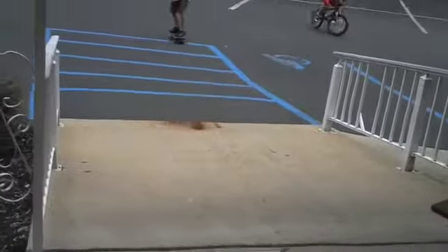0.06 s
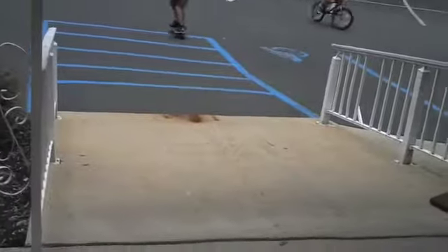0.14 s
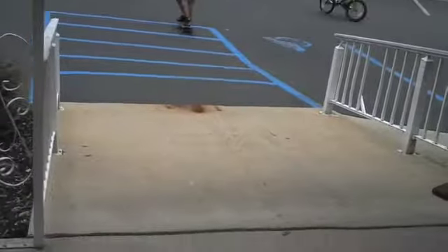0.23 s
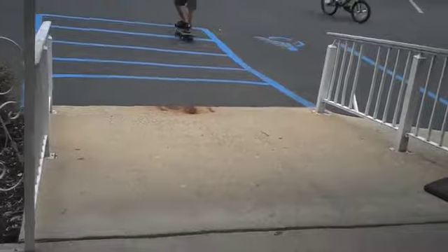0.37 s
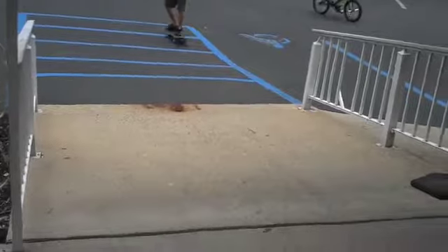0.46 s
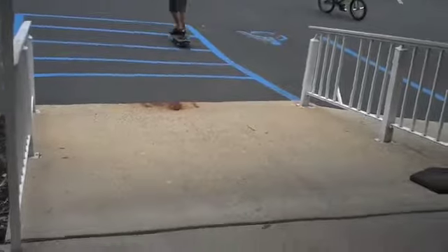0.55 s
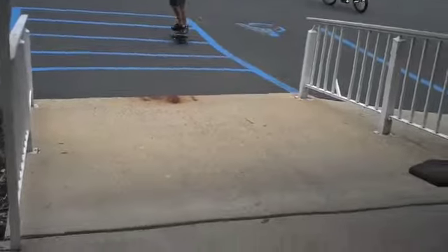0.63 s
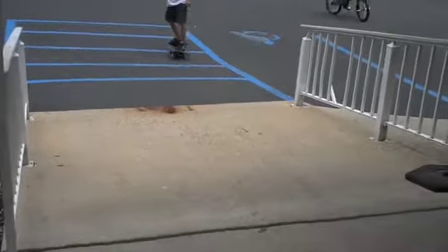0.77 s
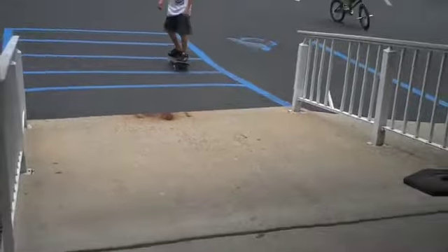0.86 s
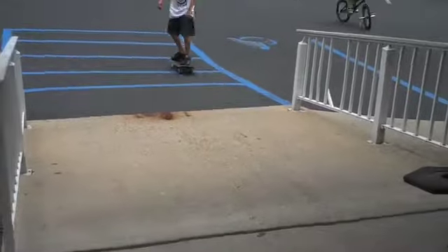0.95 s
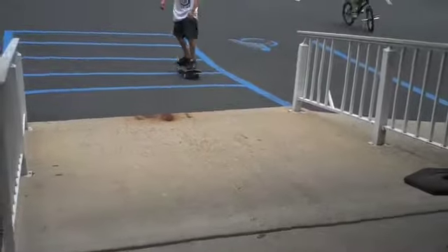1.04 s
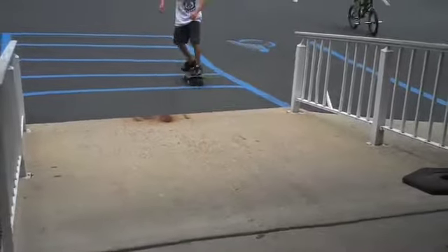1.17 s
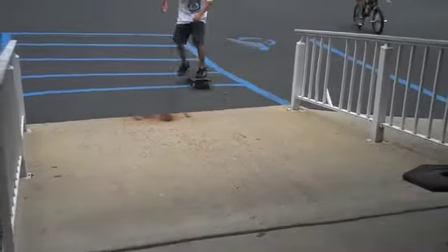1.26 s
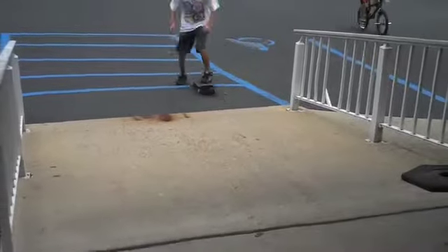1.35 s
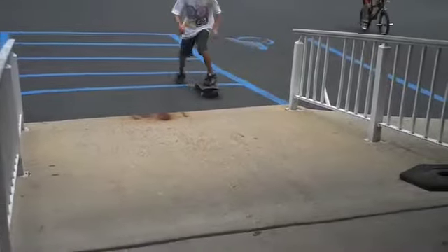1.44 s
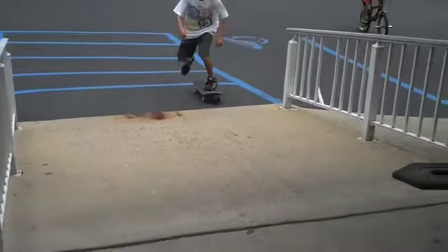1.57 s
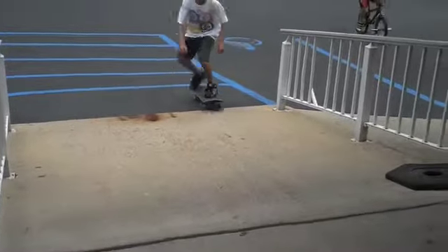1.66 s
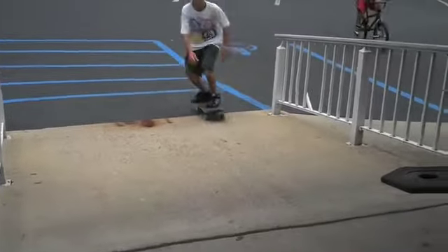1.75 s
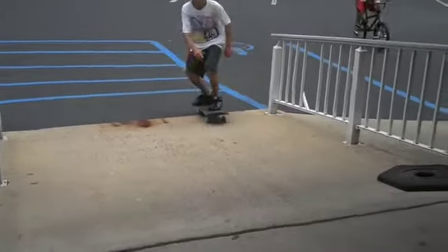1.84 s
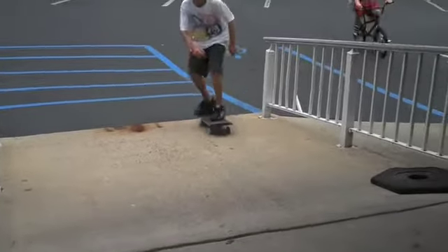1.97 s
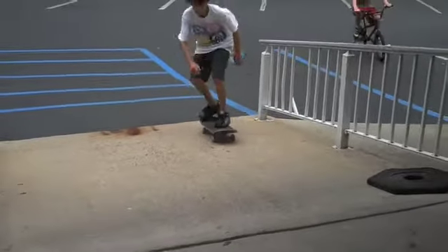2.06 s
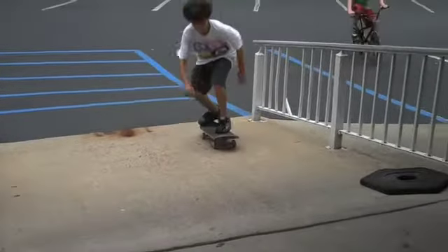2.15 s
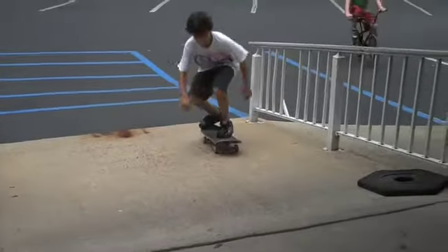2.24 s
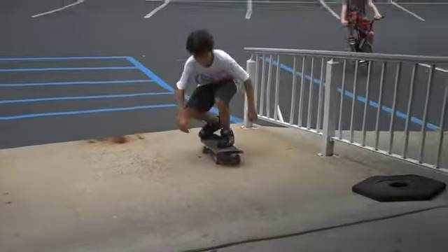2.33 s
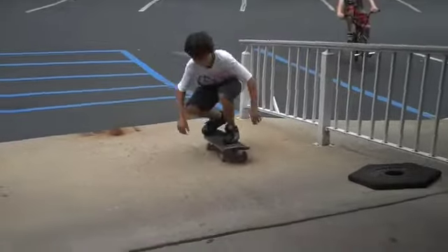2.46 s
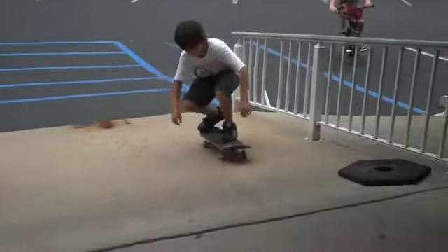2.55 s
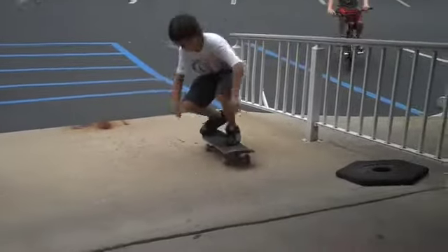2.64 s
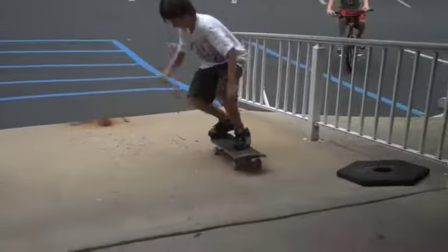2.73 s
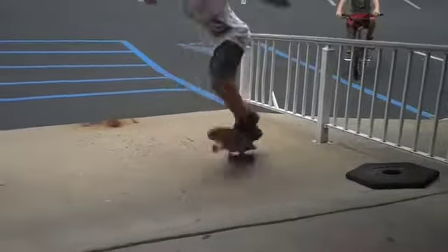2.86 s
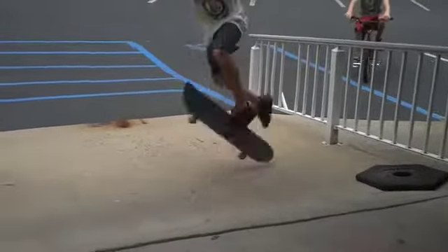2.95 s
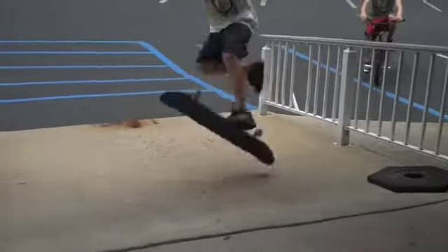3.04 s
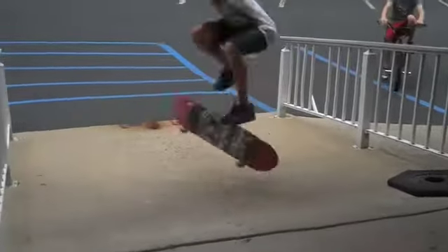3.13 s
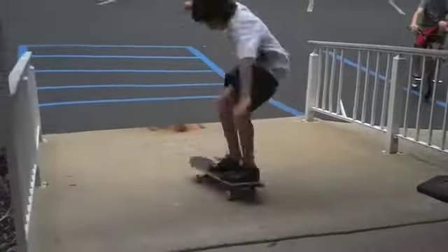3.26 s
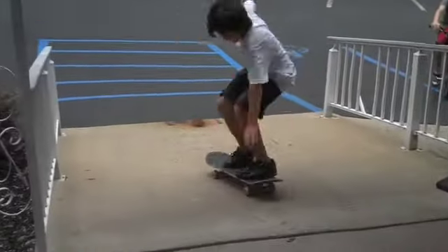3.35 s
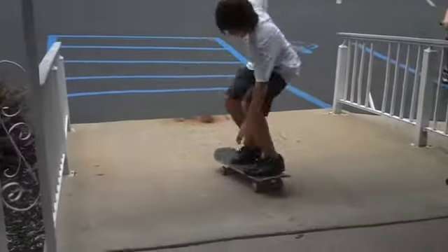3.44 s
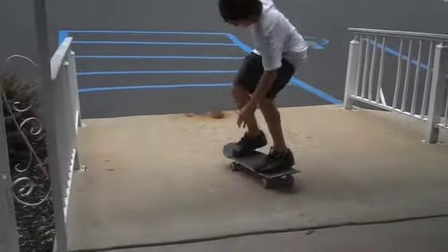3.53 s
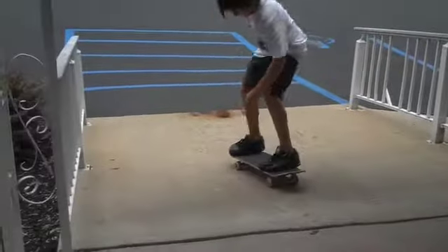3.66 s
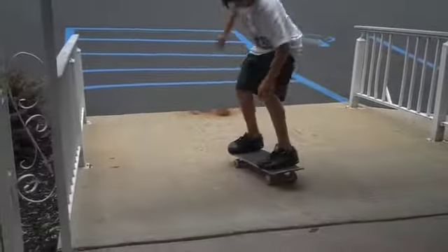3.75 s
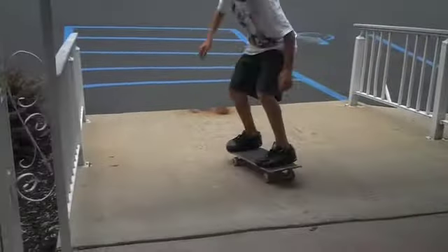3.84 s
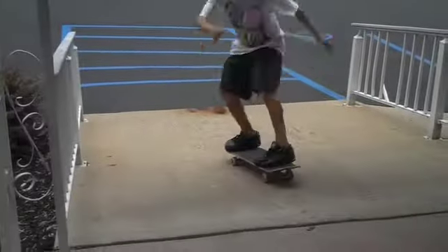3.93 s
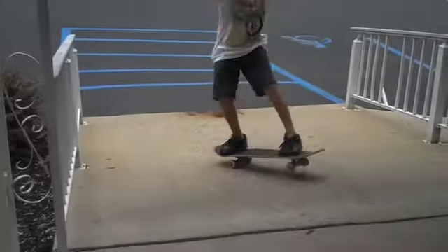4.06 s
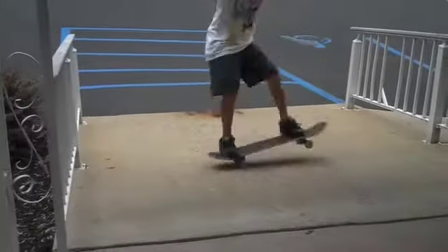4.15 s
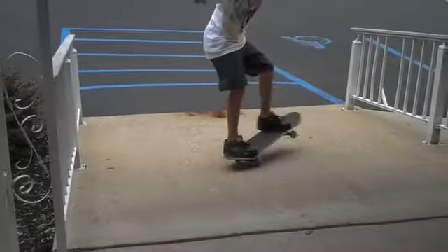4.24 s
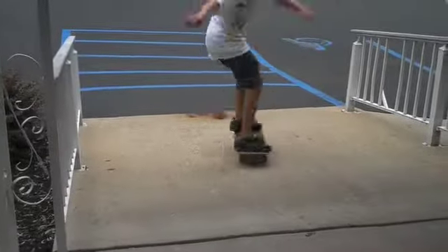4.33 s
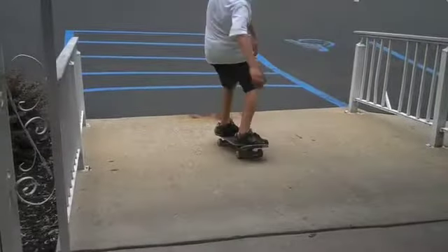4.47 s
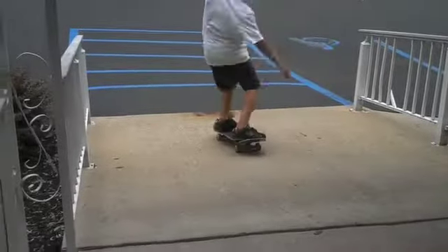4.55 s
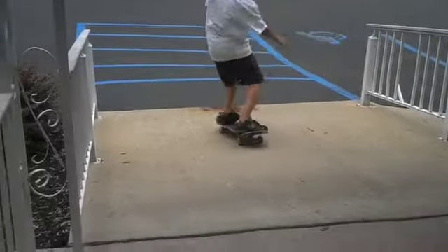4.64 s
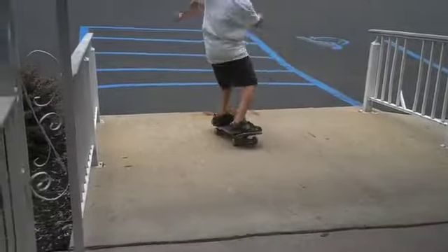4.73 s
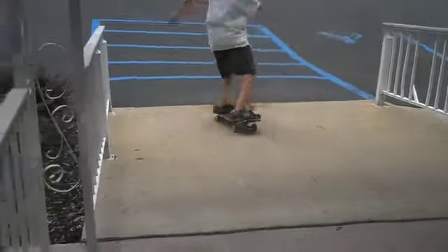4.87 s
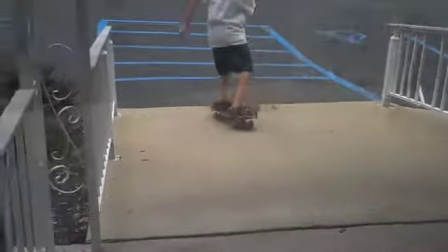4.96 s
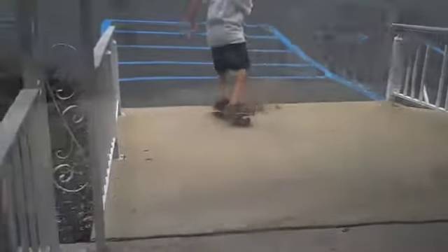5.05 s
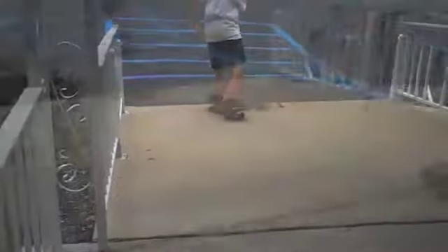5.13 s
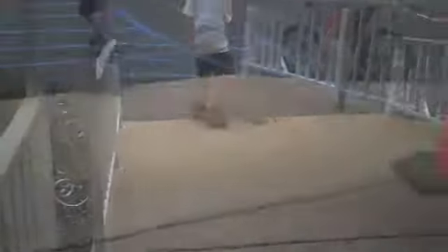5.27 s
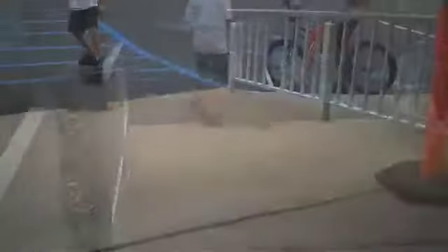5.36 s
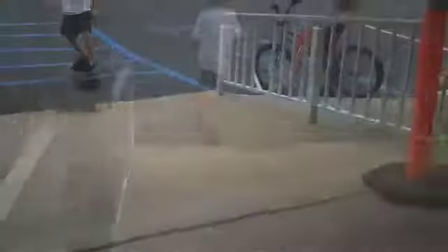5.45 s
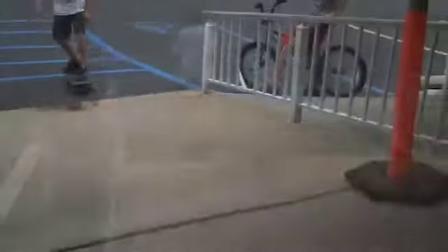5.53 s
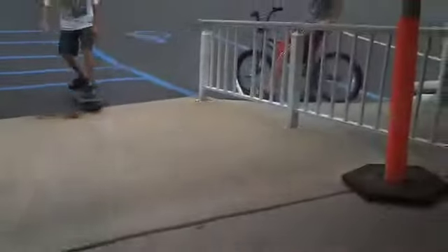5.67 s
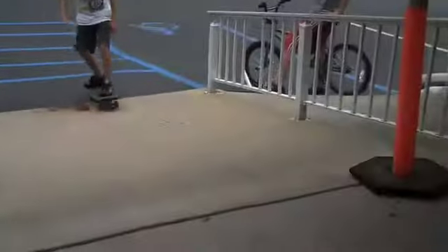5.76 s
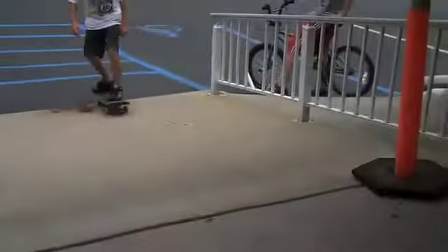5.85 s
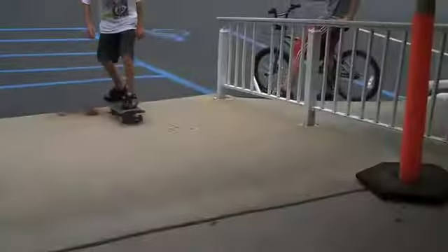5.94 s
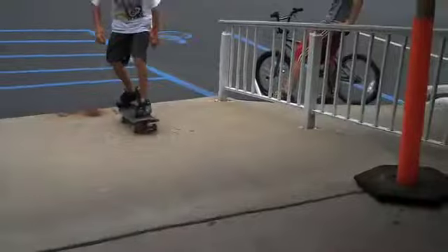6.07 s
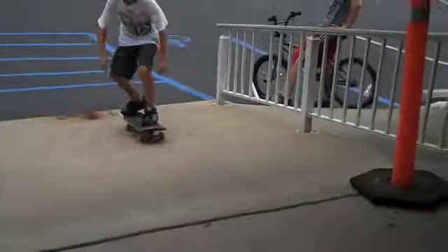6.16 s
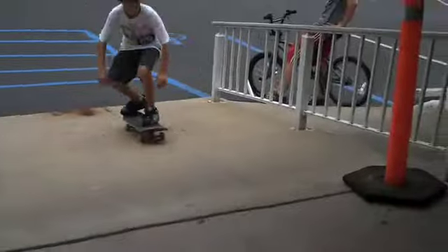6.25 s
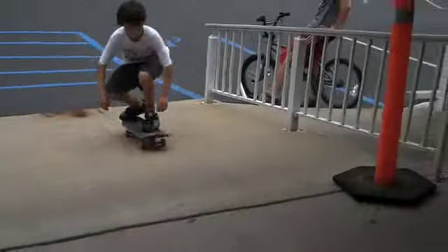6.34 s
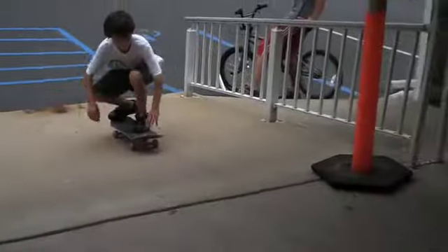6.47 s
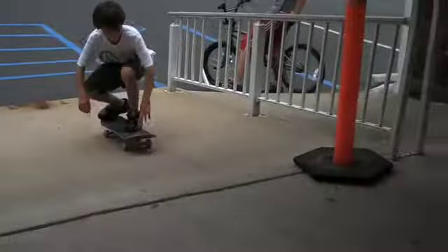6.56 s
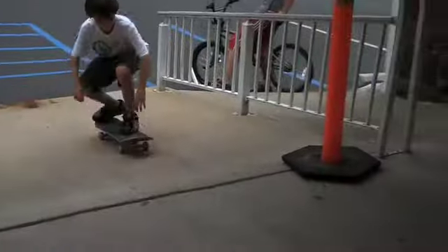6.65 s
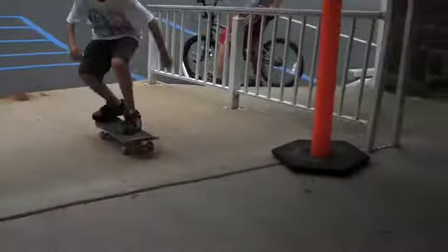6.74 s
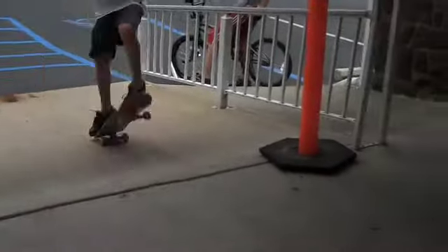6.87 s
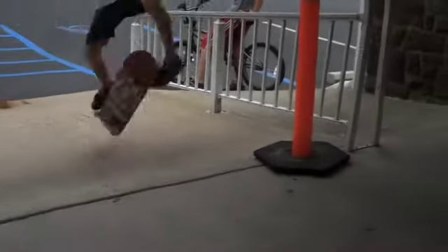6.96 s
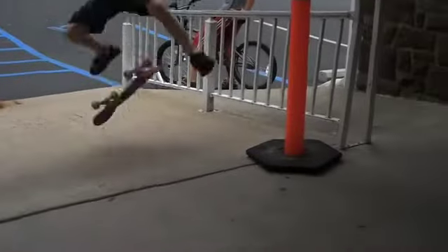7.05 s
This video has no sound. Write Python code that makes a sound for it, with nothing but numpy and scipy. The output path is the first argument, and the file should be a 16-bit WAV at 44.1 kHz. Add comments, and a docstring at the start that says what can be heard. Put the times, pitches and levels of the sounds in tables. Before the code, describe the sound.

Hard-edged grainy rolling swells toward the microphone, with a ringing wheel whine and double knock at the ramp edge. A dry crack of the deck, a brief lighter gap, then a heavy lower slap with truck rattle. Near-quiet creeping wheels, a small scrape-like knock, louder rolling again and a final pop, with short porch reflections and faint distant traffic air.

```python
"""Car park with a concrete ramp: a skateboard rolls in over asphalt, climbs, pops a trick, lands, turns away;
it comes up the ramp once more and pops again. Rolling is random grit through ground filters and wheel and deck
resonances; slaps, knocks and thuds are decaying bursts, damped sines and pulses at set times. A wall, a porch
and the yard answer over filtered-noise air; a small camera rounds off the loudest peaks and cuts the top."""
import sys
import numpy as np
from scipy import signal
from scipy.fft import rfft, irfft
from scipy.io import wavfile
from scipy.ndimage import uniform_filter1d

SR = 44100
rng = np.random.default_rng(int(sys.argv[2]) if len(sys.argv) > 2 else 0)


def to_wav(s):
    """Save 16-bit WAV."""
    ch = np.atleast_2d(s).T  # columns
    pcm = np.round(np.clip(ch, -1, 1) * 32767)  # PCM
    wavfile.write(sys.argv[1], SR, pcm.astype(np.int16))


N = 313110
T = np.arange(N) / SR  # s


def undb(db):
    """Decibels to amplitude gain."""
    return 10 ** (np.asarray(db) / 20)


def unit(x):
    """Scale to rms 1."""
    return x / np.sqrt(np.mean(x ** 2))


def curve(rows, axis=1):
    """One table column, linearly interpolated in time."""
    rows = np.asarray(rows)
    return np.interp(T, rows[:, 0], rows[:, axis])


def colour(x, points, lean=lambda hz: 0, size=2048):
    """Minimum-phase filter through (frequency [Hz], gain [dB]) points, plus an optional dB slope."""
    hz = np.maximum(np.arange(size // 2 + 1) * SR / size, 1)
    point_hz, point_db = np.transpose(points)
    gain_db = np.interp(np.log(hz), np.log(point_hz), point_db) + lean(hz)
    cepstrum = irfft(np.log(undb(gain_db)))
    # fold the cepstrum: causal response
    cepstrum[1:size // 2] *= 2
    cepstrum[size // 2 + 1:] = 0
    response = irfft(np.exp(rfft(cepstrum)))
    return signal.oaconvolve(x, response)[:len(x)]


def resonate(x, hz, width_hz):
    """Two-pole resonance."""
    b, a = signal.iirpeak(hz, hz / width_hz, fs=SR)
    return signal.lfilter(b, a, x)


def fade(t, t60_s):
    """Exponential decay, 60 dB in t60_s."""
    return np.exp(-np.log(1000) * t / t60_s)


def swell(s, width_s):
    """Gaussian rise and fall around time s, peak 1."""
    return np.exp(-((T - s) / width_s) ** 2)


def walk(rate_hz):
    """Random wander through straight-line knots, rms 1."""
    knots = rng.standard_normal(4096)
    return unit(np.interp(T * rate_hz, np.arange(len(knots)), knots))


def add(out, s, x):
    """Mix x in at time s."""
    i = int(s * SR)
    out[i:i + len(x)] += x[:len(out) - i]


# ground colour, asphalt and concrete: (frequency [Hz], gain [dB])
ASPHALT_COLOUR = [(180, -30.5), (300, -19.5), (483, -7.5), (523, -5), (606, -1), (656, -6.5), (1120, 0),
                  (1340, -4), (1640, -9.5), (1820, -5), (2010, -1), (2990, -15.5), (4500, -27),
                  (5850, -51.5), (9900, -120)]
CONCRETE_COLOUR = [(180, -48.5), (300, -9.5), (385, -21.5), (500, -4.5), (777, 1.5), (1180, 2.5),
                   (1400, 5.5), (1620, -0.5), (1820, -1), (2440, -6), (2700, -6), (3840, -9.5),
                   (4500, -18.5), (5850, -52), (9900, -120)]
# colour of deck rumble and urethane hiss: (frequency [Hz], gain [dB])
RUMBLE_COLOUR = [(40, -41.5), (80, -33.5), (130, -27.5), (200, -12.5), (270, -7), (360, 5), (470, 2),
                 (700, -25)]
HISS_COLOUR = [(2000, -33.5), (3300, 0), (4600, -2.5), (6200, 0.5), (7200, -3), (8000, -12), (9000, -20.5)]
# wheel and truck resonances: (centre [Hz], width [Hz], asphalt level [dB], concrete level [dB])
WHEEL_MODES = [(696, 86, -24, -16.5), (794, 173, -7.5, -10), (1013, 46, -16, -14), (1244, 63, -19, -37.5),
               (1619, 195, -8.5, -9.5), (2025, 110, -17.5, -15.5), (2369, 170, -20, -15)]
# resonances of the loaded deck: (centre [Hz], width [Hz], level [dB])
LOADED_DECK_MODES = [(114, 24, -21), (205, 39, -17.5), (550, 90, -6.5), (3875, 99, -14.5)]
# relative rolling level; ride in, slow turn after landing, second ride in: (time [s], level [dB])
FIRST_RUN_LEVEL = [(0, -34.5), (.62, -32.5), (.85, -27.5), (1.05, -30), (1.25, -32.5), (1.43, -29.5),
                   (1.51, -37), (1.68, -29.5), (1.86, -34), (1.98, -29.5), (2.22, -34.5), (2.45, -31.5),
                   (3.2, -40.5)]
TURN_LEVEL = [(3.42, -56), (4.0, -51.5), (4.3, -43.5), (4.65, -43), (4.83, -35.5), (5.0, -39.5)]
SECOND_RUN_LEVEL = [(5.28, -32), (5.55, -34.5), (5.76, -28.5), (5.86, -35), (5.98, -29.5), (6.22, -30.5),
                    (6.56, -38), (6.72, -28), (7.1, -41.5)]
# board's path: (time [s], distance from the camera [m])
BOARD_PATH = [(0, 12.2), (1.75, 5.56), (2.5, 3.96), (3.5, 3.35), (4.3, 4.04), (5.05, 6.24), (5.3, 7),
              (5.72, 5.7), (6.4, 4.42), (7.1, 3.38)]
RAMP_EDGE_M, EDGE_BLEND_M = 5.97, 0.12  # asphalt beyond the edge, concrete before it
NEAR_RUMBLE_DB = 5  # per halving of distance
WEIGHT_RUMBLE_DB_PER_DB = .45  # extra rumble per dB of weight_db
HISS_DB, CROUCH_HISS_DB = -13, 1.5  # re rolling level; gain per unit crouch
CREEP_DB, CREEP_DULLING_DB_PER_DB = -39.5, 0.46  # below CREEP_DB, hiss and high rings drop further
# coarse asphalt patch makes the high wheel resonances sing
PATCH_S, PATCH_WIDTH_S, PATCH_RING_DB = 0.84, 0.22, 6.5
SING_START_DB, SING_RISE_S = -4.5, 0.72  # high ring builds up as the board gathers speed


def rolling(uneven_db=1.33, slab_m=.9):
    """Grit shakes wheels and trucks; the loaded deck rumbles and the urethane hisses on the ground."""
    distance_m = curve(BOARD_PATH)
    up_ramp_m = RAMP_EDGE_M - distance_m
    concrete_share = np.clip(.5 + up_ramp_m / EDGE_BLEND_M, 0, 1)
    on_asphalt, on_concrete = np.sqrt(1 - concrete_share), np.sqrt(concrete_share)
    roll_db = curve([*FIRST_RUN_LEVEL, *TURN_LEVEL, *SECOND_RUN_LEVEL])
    crouch, weight_db = jumping()
    rumble_db, low_db, high_db, boom = run_tone()

    # slow wheels lose treble
    dull_db = CREEP_DULLING_DB_PER_DB * np.minimum(roll_db - CREEP_DB, 0)
    start_db = SING_START_DB * swell(0, SING_RISE_S)
    patch_db = PATCH_RING_DB * swell(PATCH_S, PATCH_WIDTH_S)
    high_db = high_db + dull_db + start_db + patch_db

    shake = shaking(concrete_share)
    asphalt = on_asphalt * unit(colour(shake, ASPHALT_COLOUR))
    concrete = on_concrete * unit(colour(shake, CONCRETE_COLOUR))
    body = undb(-3) * (asphalt + concrete)
    for hz, width_hz, asphalt_db, concrete_db in WHEEL_MODES:
        # each resonance wanders in level by itself
        ring_db = (low_db if hz < 1400 else high_db) + 2.34 * walk(9)
        ground_gain = on_asphalt * undb(asphalt_db) + on_concrete * undb(concrete_db)
        body += singing(hz, width_hz) * undb(ring_db) * ground_gain

    load = boom * np.clip(up_ramp_m / slab_m, 0, 1) ** 2 + crouch
    for hz, width_hz, db in LOADED_DECK_MODES:
        body += load * undb(db + 1.8 * walk(3.47)) * singing(hz, width_hz)

    near_db = NEAR_RUMBLE_DB * np.log2(RAMP_EDGE_M / distance_m)
    rumble_db = rumble_db + near_db + WEIGHT_RUMBLE_DB_PER_DB * weight_db
    rumble = unit(colour(grit(rate_hz=2000, spread_db=4.0), RUMBLE_COLOUR)) * undb(rumble_db)
    hiss_db = HISS_DB + CROUCH_HISS_DB * crouch + dull_db
    hiss = unit(colour(grit(rate_hz=14000, spread_db=4.5), HISS_COLOUR)) * undb(hiss_db)
    hiss *= undb(walk(27))

    # rough patches and uneven wheels flutter the whole sound
    flutter = undb(1.1 * walk(95) + uneven_db * walk(36))
    return undb(roll_db + weight_db - 2.5) * flutter * (body + rumble + hiss)


def grit(rate_hz, spread_db):
    """Random-sign impacts of stone grains under the wheels, a few much larger than the rest."""
    hit = rng.random(N) < rate_hz / SR
    size = undb(spread_db * np.minimum(rng.exponential(size=N), 4))
    return unit(hit * size * rng.choice([-1, 1], N))


def shaking(concrete_share):
    """Fine grit everywhere, coarser stones twice as strong on the asphalt."""
    stones = undb(-8) * grit(rate_hz=450, spread_db=2)
    return grit(rate_hz=7000, spread_db=1.5) + (1 - concrete_share / 2) * stones


def singing(hz, width_hz):
    """One resonance kept ringing by grit, rms 1."""
    narrow = resonate(grit(rate_hz=3000, spread_db=2.0), hz, width_hz)
    return unit(resonate(narrow, hz, 4 * width_hz))


# rider crouches, pushes off, unweights: (wheels go light [s], crouch depth [0-1], push level [dB])
JUMP_TIMES = [(2.782, 0.44, 4), (6.785, 1, -1)]
CROUCH_LEAD_S, CROUCH_WIDTH_S = .29, .22
PUSH_LEAD_S, PUSH_WIDTH_S = .07, .09
LIFT_S, FLIGHT_S, FREE_WHEEL_DB = .02, 0.427, -8  # unloaded wheels only whirr


def jumping():
    """Crouch depth, and the dB by which the push and the leap change the rolling."""
    crouch, weight_db = np.zeros(N), np.zeros(N)
    for s, depth, push_db in JUMP_TIMES:
        lifting = np.clip((T - s) / LIFT_S, 0, 1)
        airborne = lifting * np.clip((s + FLIGHT_S - T) / LIFT_S, 0, 1)
        crouch += depth * swell(s - CROUCH_LEAD_S, CROUCH_WIDTH_S)
        weight_db += push_db * swell(s - PUSH_LEAD_S, PUSH_WIDTH_S) + FREE_WHEEL_DB * airborne
    return crouch, weight_db


# tone of each stretch: (start [s], rumble at the ramp's edge [dB], low wheel ring [dB],
# high wheel ring [dB], boom of the deck on the slab [0-1])
RUN_TONES = [(0, -17, -1.5, 2.5, 0.02), (3.3, -19.5, 2.5, 5, 0.44), (5.1, -12, 1.5, 3, 0.06)]


def run_tone():
    """Rumble, low ring, high ring [dB] and deck boom, held per stretch with 0.1 s smoothing."""
    rows = np.array(RUN_TONES)
    current = np.searchsorted(rows[1:, 0], T)
    return uniform_filter1d(rows[current, 1:], size=SR // 10, axis=0).T


# modes of the maple deck: (frequency [Hz], level [dB], t60 [s])
DECK_MODES = [(235.5, -10, 0.2), (324, -7, 0.2), (440, -12, 0.25), (533, -21, 0.42), (606, -13, 0.092),
              (659.6, 1.5, .14), (711, 1, 0.083), (870, 2.5, 0.17), (1062, -4, 0.14), (1385, -10, .13),
              (1580, 4, 0.069), (1620, 9, 0.063), (1702, 2, 0.14), (1920, -25, .12), (2090, -13, 0.043),
              (2150, -19, .13), (2465, 8, 0.085), (2380, -23, 0.11), (2700, -9.5, 0.11), (3125, 3, .13),
              (3570, -12.5, .11), (4046, -3, 0.13), (4230, -4, 0.092)]
# deck struck by slab or shoes: (time [s], level [dB], blow centre [Hz], clatter t60 [s], ring level [dB])
DECK_SLAPS = [(2.8986, -7.5, 1950, 0.046, -6.5), (2.903, -12, 2000, 0.061, -4.5),
              (3.2087, -26, 1520, 0.25, -11), (3.2416, -5.5, 1330, 0.063, -14),
              (3.2695, -9, 790, 0.056, -9), (3.278, -8, 560, 0.062, -3.5), (3.3170, -27.5, 600, 0.06, 10.5),
              (6.8912, -9, 2080, 0.087, -2.5), (6.9010, -26, 1800, 0.091, 4)]
# colour of the crack: (frequency [Hz], gain [dB])
CRACK_COLOUR = [(30, -33), (120, -30.5), (220, -13), (350, -6.5), (700, -4), (1000, 0), (1300, -1.5),
                (1700, 3), (2400, 1.5), (3200, -5), (4500, -7.5), (7000, -9.5), (8500, -24)]


def slaps(focus_db=4.0):
    """The hard tail wakes the deck's high modes, the soft weight of the shoes its low ones."""
    out, t = np.zeros(N), T[:SR // 2]
    mode_hz, mode_db, mode_t60_s = np.transpose(DECK_MODES)
    modes = np.sin(2 * np.pi * mode_hz[:, None] * t) * fade(t, mode_t60_s[:, None])
    # neighbouring modes swing in opposite directions at the deck's end
    signs = (-1) ** np.arange(len(DECK_MODES))
    for s, db, centre_hz, t60_s, ring_db in DECK_SLAPS:
        def focus(hz):
            """Gain falls with squared octaves from the blow's centre."""
            return -focus_db * np.maximum(np.log2(hz / centre_hz), -1) ** 2

        crack = clatter(t, t60_s, CRACK_COLOUR, focus)
        mode_octaves = np.maximum(np.log2(mode_hz / centre_hz), -1.3)
        gains = undb(mode_db - 8 * mode_octaves ** 2)
        ring = (gains * signs) @ modes / np.linalg.norm(gains)
        add(out, s, undb(db) * (crack + undb(ring_db) * ring))
    return out


def clatter(t, t60_s, points, lean):
    """A blow's dense, decaying random rattle, starting near rms 1."""
    envelope = fade(t, t60_s)
    burst = colour(rng.choice([-1, 1], len(t)) * envelope, points, lean)
    return unit(burst) * np.sqrt(np.mean(envelope ** 2))


# wheels hit joints, stones or slab: (time [s], level [dB], rattle t60 [s], treble tilt [dB/octave],
# truck ring [Hz], ring level [dB])
WHEEL_KNOCKS = [ (.6660, -19, .045, -0.5, 713, -1.5), (.0800, -31.5, .07, -4, 726, 6.5),
                (0.855, -24, 0.02, 13, 1615, 9.5), (0.928, -27, 0.019, 1, 1630, 9),
                (1.1421, -26, 0.068, -1, 1540, 9), (1.4340, -26, 0.049, 0.5, 1266, -2),
                (1.6717, -13, 0.096, -4, 758, -1.5), (1.6927, -19.5, 0.021, 2, 927, 7),
                (1.82, -13.5, .04, -7.5, 795, 4.5), (1.8241, -18, 0.02, 1, 1910, 5),
                (1.945, -24.5, 0.054, -2.5, 1146, 1), (3.2397, -21, 0.054, -2, 1810, -6),
                (3.2490, -9, 0.02, -3, 703, 2.5), (3.2565, -12.5, 0.059, -2, 654, 12),
                (3.2738, -16, 0.043, 1, 893, 4), (3.6288, -35, 0.074, -4.5, 1650, -8),
                (4.4022, -20, 0.034, 0.5, 1600, 1), (4.4065, -16.5, 0.082, -4, 1350, -17),
                (4.4181, -19.5, 0.044, -3, 694, -2.5), (4.566, -31, 0.088, -2, 1520, 3.5),
                (5.2500, -29.5, 0.14, -0.5, 1520, -4), (5.3900, -31.5, 0.29, 0, 835, 4.5),
                (5.48, -33.5, 0.077, 1.5, 1590, 10), (5.6500, -19.5, 0.055, -2.5, 763, -3),
                (5.7882, -13.5, .055, -2.5, 1074, 3), (5.9779, -34.5, .049, 7, 735, 12.5),
                (6.2468, -25, .041, -2, 874, -0.5), (6.6960, -24, 0.044, -9.5, 794, 1.5)]
# colour of the knock: (frequency [Hz], gain [dB])
KNOCK_COLOUR = [(30, -21), (130, -41), (250, -24.5), (450, -15), (750, -1.5), (1100, 0), (1600, 0.5),
                (2100, 1), (2900, -9), (4500, -13.5), (6500, -13), (8500, -28)]


def knocks(ring_t60_s=0.051, contact_s=0.0012):
    """Wheels drop over an edge and jolt the trucks; the soft urethane rounds the attack."""
    out, t = np.zeros(N), T[:SR // 4]
    attack = np.minimum(t / contact_s, 1)
    for s, db, t60_s, tilt_db, ring_hz, ring_db in WHEEL_KNOCKS:
        rattle = clatter(t, t60_s, KNOCK_COLOUR, lambda hz: tilt_db * np.log2(np.maximum(hz / 1200, .5)))
        ring = undb(ring_db) * np.sin(2 * np.pi * ring_hz * t) * fade(t, ring_t60_s)
        add(out, s, undb(db) * (rattle + ring) * attack)
    return out


# short deep thuds: (time [s], pulse peak before the high-pass [dB])
DEEP_THUDS = [(0.819, -33), (1.672, -30), (1.822, -37), (2.901, -20), (3.243, -16), (3.283, -18),
              (6.894, -25)]


def thuds(push_s=0.00048):
    """One short push of air each, high-passed at 25 Hz."""
    out, x = np.zeros(N), T[:SR // 20] / push_s
    pulse = x * np.exp(1 - x)
    for s, db in DEEP_THUDS:
        add(out, s, undb(db) * pulse)
    return signal.sosfilt(signal.butter(2, 25, "high", fs=SR, output="sos"), out)


WALL_M = 3.4  # from the path to the wall beside the ramp


def side_wall(x, wall_db=-9):
    """The wall's echo lags more as the board draws near, so its comb of peaks slides."""
    distance_m = curve(BOARD_PATH)
    detour_m = np.hypot(distance_m, 2 * WALL_M) - distance_m
    lag_s = detour_m / 343  # speed of sound, m/s
    return x + undb(wall_db) * np.interp(T - lag_s, T, x, left=0)


# echoes from the building: (delay [s], level [dB])
BUILDING_ECHOES = [(.034, -21.5), (.045, -31)]
# colour of the reverberant tails: (frequency [Hz], gain [dB])
PORCH_COLOUR = [(60, -21.5), (250, -3.5), (600, -2), (1200, 6), (2000, -2), (4000, 3), (8000, 2)]


def surroundings(x, porch_t60_s=0.17, porch_db=-15, yard_t60_s=0.7, yard_db=-25):
    """Discrete echoes, the short ring of the porch and a faint long tail from the car park."""
    t = T[:SR]
    response = np.zeros(SR)
    onset = np.clip(t / 0.032, 0, 1) ** 2
    for t60_s, db in ((porch_t60_s, porch_db), (yard_t60_s, yard_db)):
        tail = colour(rng.standard_normal(SR) * fade(t, t60_s) * onset, PORCH_COLOUR)
        response += undb(db) * tail / np.linalg.norm(tail)
    for s, db in BUILDING_ECHOES:
        add(response, s, undb([db]))
    return x + signal.oaconvolve(x, response)[:N]


# distant traffic and open air: (frequency [Hz], gain [dB])
AIR_COLOUR = [(30, -18.5), (60, -27), (120, -17), (200, -7.5), (430, -5.5), (700, -4), (1000, -0.5),
              (1250, -5), (1600, -6), (2500, -15), (4000, -23.5), (6300, -34), (8500, -51)]
AIR_DB = -50


def open_air():
    """Distant traffic and air: filtered noise, level wandering slightly."""
    noise = unit(colour(rng.standard_normal(N), AIR_COLOUR))
    return noise * undb(AIR_DB + 0.41 * walk(2.9))


def scene():
    """The board in its surroundings, over the open air."""
    board = side_wall(rolling() + slaps() + knocks())
    return (surroundings(board) + thuds() + open_air())[None]


TOP_HZ = 8300


def record(dry):
    """The camera rounds off the loudest peaks and cuts the top."""
    squashed = dry / (1 + (dry / .75) ** 6) ** (1 / 6)
    low_pass = signal.cheby1(12, .2, TOP_HZ, fs=SR, output="sos")  # 0.2 dB ripple
    return signal.sosfilt(low_pass, squashed)


dry = scene()
out = record(dry)
to_wav(out)
```